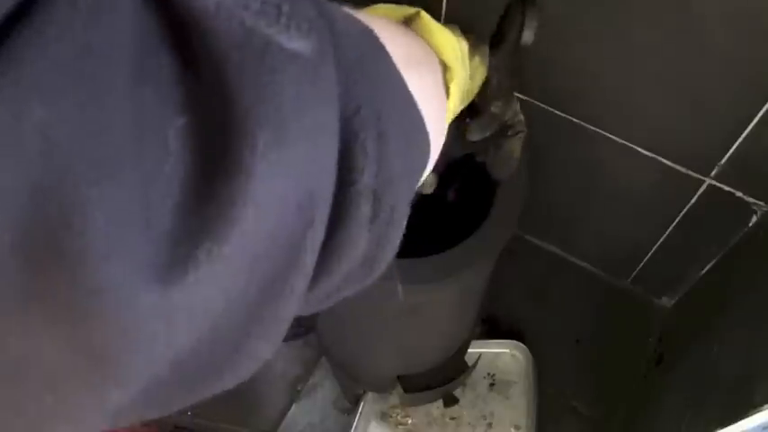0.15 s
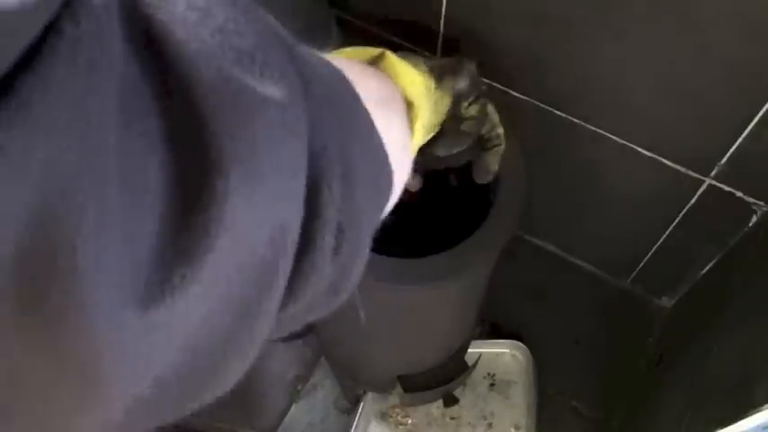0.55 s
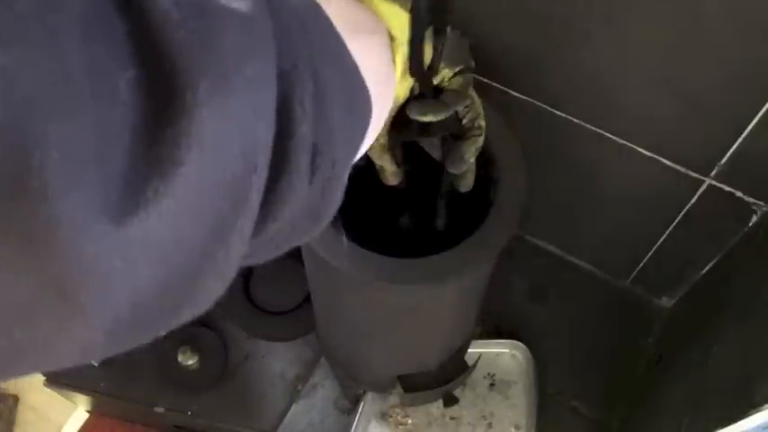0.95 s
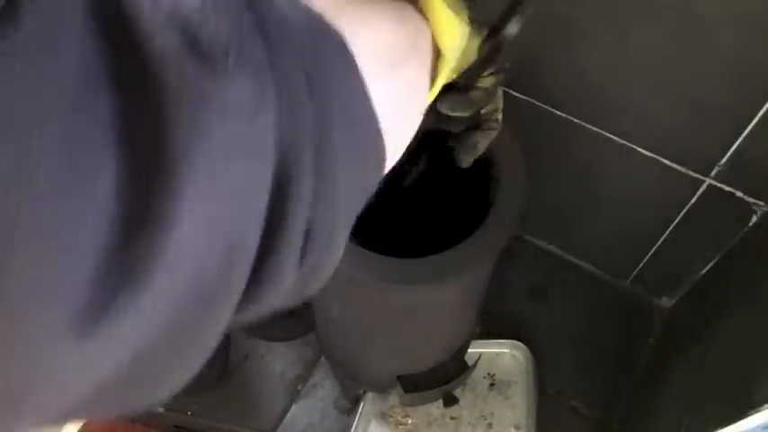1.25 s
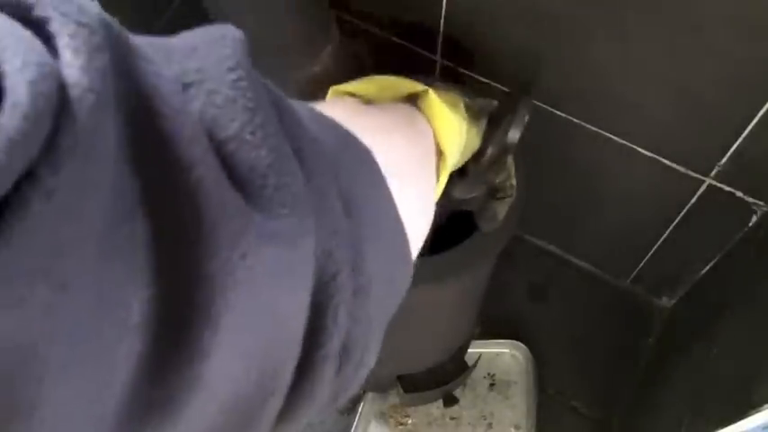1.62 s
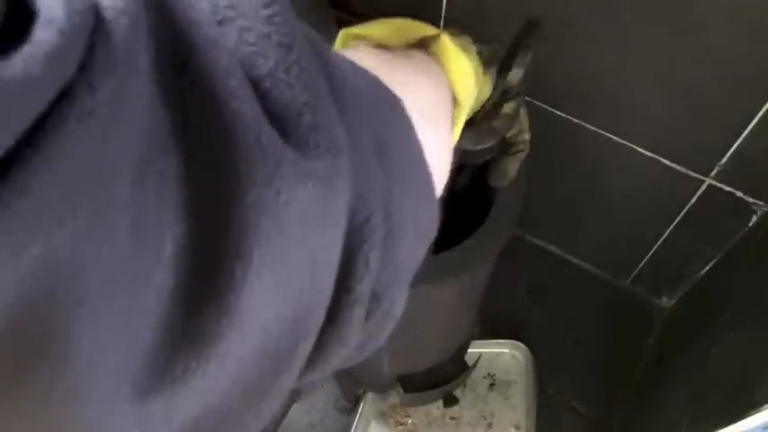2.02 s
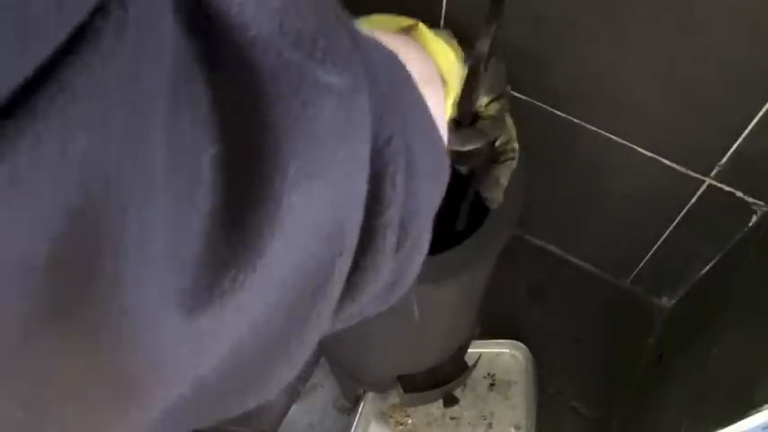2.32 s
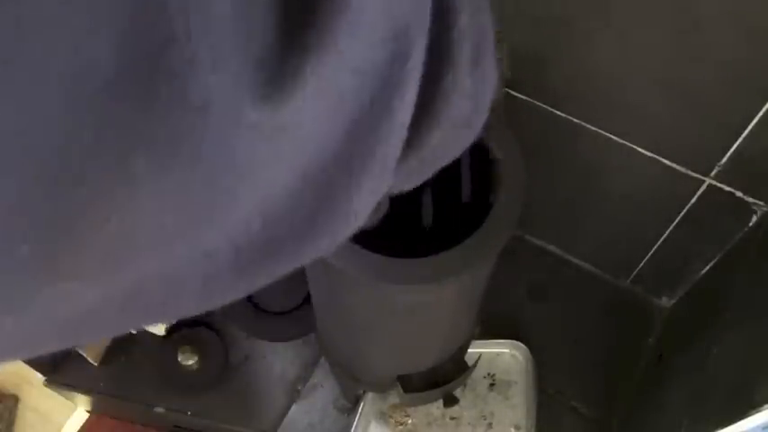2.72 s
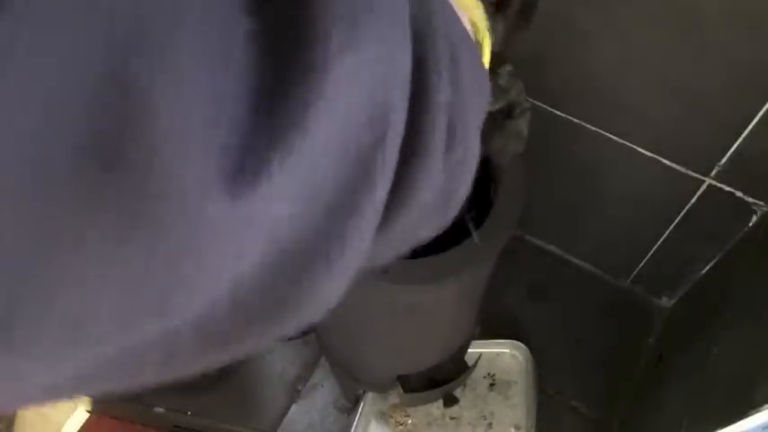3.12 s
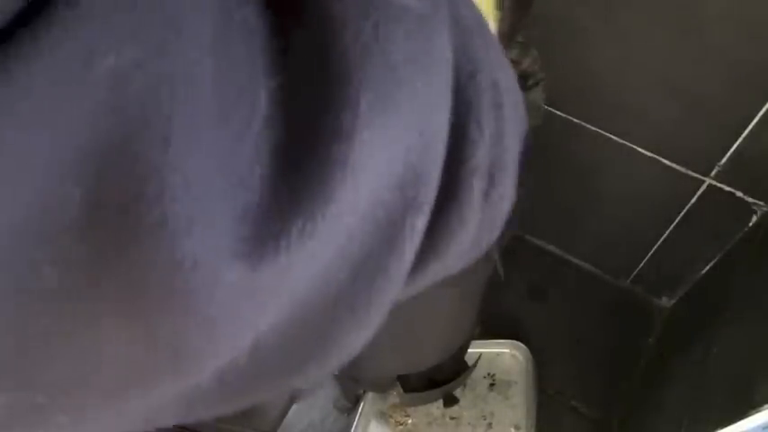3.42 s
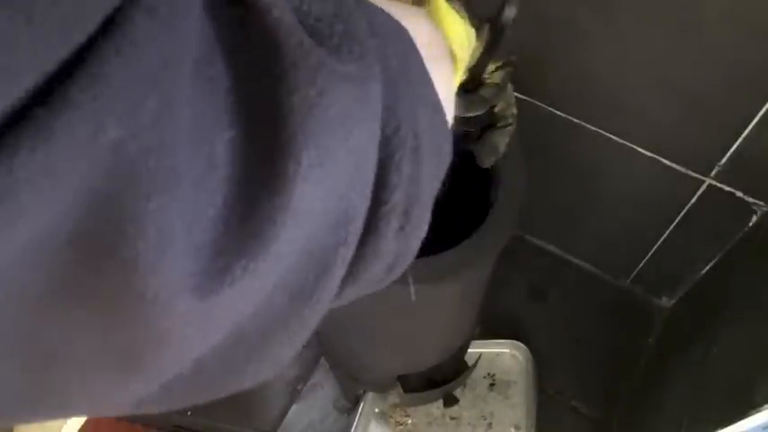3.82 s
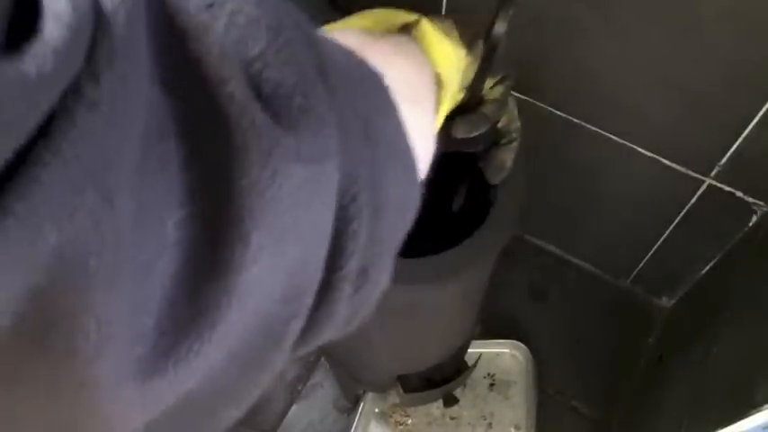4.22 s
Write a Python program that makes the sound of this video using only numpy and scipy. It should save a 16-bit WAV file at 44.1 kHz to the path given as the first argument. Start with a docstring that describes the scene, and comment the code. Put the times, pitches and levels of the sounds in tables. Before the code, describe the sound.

Close by, metal tongs knock unevenly around the inside of a small stove, making bright ringing clacks over a hollow boom. Short gritty scrapes and cracking cinders fill the gaps, and a loose grate shifts with dull knocks and small chinks. The strikes come singly and in quick clusters, ending on one more thudding clack. The stove rings on faintly in a tiled corner with a short echo and quiet background hiss.

```python
"""Sharp, ringing clacks of steel tongs against the firebox of a small metal stove.
Each blow rings the wall, the tongs and the hollow inside. Between blows the tips stick and
slip through ash, scraping and cracking cinders, while the loose grate bumps, groans and
chinks in its seat. The stove sings on faintly; a tiled corner adds a short reverb."""
import sys
import numpy as np
from scipy import signal
from scipy.fft import rfft, irfft, next_fast_len
from scipy.io import wavfile
from scipy.ndimage import map_coordinates

SR = 44100
rng = np.random.default_rng(int(sys.argv[2]) if len(sys.argv) > 2 else 0)


def store_pcm(level_fs):
    """Save levels as 16-bit WAV."""
    pcm = np.round(np.clip(level_fs, -1, 1) * 32767).astype(np.int16)
    wavfile.write(sys.argv[1], SR, np.atleast_2d(pcm).T)


N = 192449
TIME_S = np.arange(N) / SR
AGE_S = np.arange(SR // 2) / SR  # time since a blow


# blows on the firebox, relative levels:
# start_s, clack_db, treble_db, wall_db, spot_hz, tongs_db, thump_db
TONG_BLOWS = [(0.0234, -27, -32, -40, 1260, -39, -34), (0.0557, -16.5, -9, -43, 1620, -45, -62),
              (0.1661, -19, -8, -43.5, 930, -31, -34), (0.5265, -12.5, -7.5, -25.5, 2010, -35, -38),
              (0.6261, -27, -6, -40, 1010, -34, -44), (1.265, -14.5, -2, -23, 1330, -31, -42),
              (1.3167, -29, -5, -27, 1210, -30, -39), (1.4294, -22.5, -57, -28.5, 1100, -36.5, -40.5),
              (1.6231, -15.5, 4, -38, 1070, -31.5, -32.5), (2.0019, -31, 7.5, -36.5, 1290, -36, -31),
              (2.1119, -21, -34, -26.5, 1630, -34.5, -34.5), (2.2067, -15, 4, -39, 1470, -42, -29),
              (2.3055, -23.5, -8, -32.5, 1740, -32.5, -42), (2.3351, -25, -6, -27, 2000, -34.5, -59),
              (2.7253, -49, -25, -25.5, 1440, -46, -34), (2.744, -16.5, -5, -26, 1440, -31, -33),
              (2.838, -47, -18, -24, 1420, -37.5, -31), (2.861, -42, -14, -30, 1370, -41.5, -27),
              (3.573, -11.5, 0, -28.5, 2180, -52, -45), (3.7755, -27.5, -12, -32, 1130, -36.5, -25.5),
              (4.3231, -29.5, 2, -31.5, 970, -47, -21.5)]
# tips springing free: start_s, pitch_hz, level_db, t60_s
TIP_PINGS = [(3.238, 5900, -43.5, 0.16), (3.283, 6480, -46, 0.15), (3.284, 5230, -55, 0.34)]

def strikes(choke_s=0.42):
    """Each blow clacks and rings wall, tongs and firebox air; the tips ping as they spring free."""
    out = np.zeros(N)
    choke = np.exp(-(AGE_S / choke_s) ** 4)  # tongs settle against the wall, damping both
    for start_s, clack_db, treble_db, wall_db, spot_hz, tongs_db, thump_db in TONG_BLOWS:
        metal = choke * (amp(wall_db) * wall_ring(spot_hz) + amp(tongs_db) * tongs_ring())
        contact = amp(clack_db - 5.5) * clack(treble_db)
        add(out, start_s, contact + metal + amp(thump_db) * thump(shudder_db=-7))
    for start_s, pitch_hz, level_db, t60_s in TIP_PINGS:
        ping = struck(np.sin(2 * np.pi * pitch_hz * AGE_S) * fade(t60_s))
        add(out, start_s, amp(level_db) * ping)
    return out


# steel contact: freq_hz, density_db
CLACK_SPECTRUM = [(100, -49), (600, -13), (1500, -11.5), (2600, -4.5), (3600, -0.5), (4500, 1.5),
                  (5500, -3), (7300, -5.5), (8100, -9), (9500, -11.5), (12000, -19.5), (15000, -34)]

def clack(treble_db, prong_lag_s=0.0033, prong_db=-9):
    """Steel on steel, one prong just after the other; harder contacts carry more treble."""
    knots_hz = np.linspace(0, SR / 2, num=110)
    colour_db = 2 * rng.standard_normal(len(knots_hz))
    shelf = [(6300, 0), (9500, 1)]
    burst = coloured(rng.standard_normal(len(AGE_S)), CLACK_SPECTRUM)
    burst = filtered(burst, lambda hz: amp(np.interp(hz, knots_hz, colour_db)
                                           + treble_db * along(shelf, hz)))
    first_prong = (fade(t60_s=.047) + amp(-4) * fade(t60_s=.015)) * rise(.0002)
    second_prong = amp(prong_db) * np.interp(AGE_S - prong_lag_s, AGE_S, first_prong)
    return struck(burst * np.hypot(first_prong, second_prong))


# firebox wall: pitch_hz, level_db, t60_s
WALL_MODES = [(728, -1, .3), (1038, -4, .2), (1057, 0, .26), (1222, -6, .2), (1364, -1, .22),
              (1418, -4, .26), (1531, 0, .22), (1568, -3, .2), (1723, -5, .2), (1925, -6, .2),
              (2135, -4, .24), (2176, 1, .26), (2380, -8, .2), (2559, 0, .2)]
# its dense weak modes: freq_hz, density_db
WALL_SPECTRUM = [(300, -26), (620, -1), (1000, -13), (1600, 0.5), (2400, -2), (3200, 5), (6000, -35)]

def wall_ring(spot_hz, focus_db=13):
    """The struck spot favours wall modes near one pitch."""
    def favour_db(hz):
        return -focus_db * np.log2((hz + 1) / spot_hz) ** 2

    modes = [(hz, db + favour_db(hz), t60_s) for hz, db, t60_s in detuned(WALL_MODES, spread=.0019)]
    spectrum = [(hz, db + favour_db(hz) / 2) for hz, db in WALL_SPECTRUM]
    return amp(-.5) * ring(modes, scatter_db=2.5) + amp(-4.5) * dense_ring(spectrum, t60_s=.11)


# steel tongs: pitch_hz, level_db, t60_s
TONGS_MODES = [(2692, -4, .2), (2929, -4, .2), (3171, -2, .22), (3494, -2, .17), (3677, -3, .22),
               (3960, -1, .22), (4151, -1, .24), (4436, -1, .17), (4657, -3, .2), (5233, -4, .2),
               (5674, -4, .17), (6067, -6, .2), (6288, -7, .2), (6729, -8, .2), (7230, -7, .17)]
# their dense weak modes: freq_hz, density_db
TONGS_SPECTRUM = [(1200, -50), (2500, 5.5), (4200, 13), (7200, -13.5), (8100, -1), (9500, -14),
                  (12000, -56), (15000, -42)]

def tongs_ring():
    """The tongs ring a little differently with every grip."""
    modes = detuned(TONGS_MODES, spread=.018)
    return ring(modes, scatter_db=3) + dense_ring(TONGS_SPECTRUM, t60_s=.1)


# firebox air: pitch_hz, width_hz, level_db
AIR_MODES = [(148, 40, -11), (248, 28, -9), (319, 28, -1), (340, 28, 0), (720, 45, -10)]
# shaking stove body: freq_hz, density_db
RUMBLE_SPECTRUM = [(20, 4), (50, -2), (85, -10), (140, -6), (215, 0.5), (450, -8), (900, -12), (2500, -44)]

def thump(shudder_db, boom_db=11):
    """A blunt push and a short shudder of the stove boom in the firebox."""
    shift = np.exp(.025 * rng.standard_normal())  # the hand in the opening retunes the air
    air = [(hz * shift, width_hz, db) for hz, width_hz, db in AIR_MODES]
    shudder = rng.standard_normal(len(AGE_S)) * fade(t60_s=.05) * rise(.014)
    dull_shudder = coloured(shudder, [(500, -5.5), (1200, -6), (2500, -24), (6000, -42)])
    rattle = struck(resonate(dull_shudder, air))
    push = AGE_S * np.exp(-AGE_S / .00042)
    boom = struck(resonate(push, air) * rise(.012))
    hollow = struck(rattle + amp(boom_db) * boom)
    return struck(hollow + amp(shudder_db) * struck(coloured(shudder, RUMBLE_SPECTRUM)))


# tips rubbing: freq_hz, density_db
SCRAPE_SPECTRUM = [(100, 7), (400, -12), (560, -23), (730, 20), (900, -1), (1100, 4.5), (1700, 11),
                   (2500, -3), (3500, -14), (6000, -70)]

def raking(slip_rate_hz=70, slip_db=-1.5):
    """The tips stick and slip over cinders, shaking the firebox and crushing grit."""
    rumble_gain, scrape_gain, grit_gain = stroke_gains()
    wander = map_coordinates(rng.standard_normal(2000), [TIME_S * slip_rate_hz])
    slips = unit(amp(slip_db * wander))
    judder = grains(rate_hz=730, spread_db=3) * slips
    rumble = amp(-5) * unit(resonate(judder, AIR_MODES)) + amp(-4.5) * coloured(judder, RUMBLE_SPECTRUM)
    rub = grains(rate_hz=2000, spread_db=4) * slips
    damped_wall = ring(WALL_MODES, scatter_db=2) * fade(t60_s=.5)
    scrape = amp(-6) * coloured(rub, SCRAPE_SPECTRUM) + amp(-11.5) * drive(rub, damped_wall)
    return rumble_gain * rumble + scrape_gain * scrape + grit_gain * cinders(slips)


# pulls through the ash: start_s, length_s, end_pressure_db, build_db, grit_over_scrape_db
RAKE_STROKES = [(0.0, 0.013, -27.5, -29, -4), (0.089, 0.097, -32, 5, -8), (0.288, 0.12, -48, -11, -9),
                (0.592, 0.076, -25, 6.5, -3.5), (0.689, 0.08, -17.5, 9, -4.5),
                (0.878, 0.11, -41, 14.5, 9.5), (0.95, 0.12, -31.5, 1, -0.5), (1.14, 0.042, -39, 14, 0),
                (1.63, 0.12, -35.5, -0.5, -3), (1.784, 0.14, -43, -4, 0), (2.218, 0.074, -34, -4.5, -6),
                (2.312, 0.064, -21, 9.5, -12), (2.4, 0.02, -35.5, 9, 0.5), (2.532, 0.031, -66, 8, 14),
                (2.644, 0.1, -61.5, 1.5, 4), (2.874, 0.21, -53.5, -15.5, -7.5), (3.02, 0.14, -33, 2, -7),
                (3.246, 0.05, -37, 2, -9.5), (3.642, 0.079, -29, -2, -6), (3.717, 0.085, -26.5, 17, -7.5),
                (3.842, 0.066, -37.5, -5, -8)]

def stroke_gains(bite_s=0.014):
    """Each pull bites, changes pressure and lets go: gains of rumble, scrape and grit."""
    power = np.zeros((3, N))
    fall_db_per_s = np.array([[143], [201], [244]])
    for start_s, length_s, end_db, build_db, grit_db in RAKE_STROKES:
        age_s = TIME_S - start_s
        bite = np.clip(age_s / bite_s, 0, 1)
        pressure_db = end_db - build_db * np.clip(1 - age_s / length_s, 0, 1)
        rumble_db = -15.5 + .62 * pressure_db  # even a light pull rumbles
        levels_db = np.array([rumble_db, pressure_db, pressure_db + grit_db])
        release_db = fall_db_per_s * np.maximum(age_s - length_s, 0)
        power += (bite * amp(levels_db - release_db)) ** 2
    return np.sqrt(power)


# crushed ash: freq_hz, density_db
GRIT_SPECTRUM = [(1000, -49), (2300, 1), (3300, 9), (4500, 2), (6000, 1.5), (7400, -4.5), (8100, -6),
                 (9200, -3), (11000, -10.5), (15000, -22.5)]

def cinders(slips, lumps=6):
    """Fine ash hisses; coarser lumps snap against the tips and ring the tongs."""
    ash = coloured(grains(rate_hz=3000, spread_db=3.5) * slips, GRIT_SPECTRUM)
    snaps = [grains(rate_hz=40, spread_db=4) * slips for _ in range(lumps)]
    crunch = unit(sum(drive(snap, cinder_ring()) for snap in snaps))
    return amp(-9) * ash + amp(-2.5) * crunch + amp(-11) * drive(sum(snaps), tongs_ring())


def cinder_ring(scatter_db=7):
    """Every lump has its own resonances."""
    knots_hz = np.geomspace(1000, 15000, num=36)
    colour_db = along(GRIT_SPECTRUM, knots_hz) + scatter_db * rng.standard_normal(len(knots_hz))
    return dense_ring(list(zip(knots_hz, colour_db)), t60_s=.043)


# cinders breaking: start_s, relative_db
CINDER_CRACKS = [(0.5902, -24), (0.659, -27), (0.746, -24), (0.772, -19), (0.858, -29), (0.9674, -26),
                 (1.181, -33), (1.742, -31), (1.925, -40.5), (2.38, -28), (3.2357, -32.5), (3.691, -29)]

def cracks():
    """Larger cinders break with a bright snap that stirs the wall."""
    out = np.zeros(N)
    for start_s, relative_db in CINDER_CRACKS:
        crack = amp(-8.5) * clack(treble_db=5) + amp(-15) * wall_ring(spot_hz=1260)
        add(out, start_s, amp(relative_db) * crack)
    return out


# blunt knocks: start_s, level_db
GRATE_BUMPS = [(.001, -25.5), (0.136, -37), (0.427, -26.5), (0.455, -36), (0.639, -23), (0.715, -35),
               (.803, -29), (1.131, -36.5), (1.183, -36), (1.216, -36.5), (1.807, -32), (2.494, -34),
               (3.175, -29), (3.241, -37), (4.091, -36.5)]
# slides in the seat: start_s, length_s, level_db
GRATE_SHOVES = [(1.045, 0.031, -33.5), (1.789, 0.022, -34), (1.858, 0.051, -31.5), (2.365, 0.028, -25),
                (2.414, 0.012, -42), (2.725, 0.025, -29.5), (2.84, 0.066, -32.5), (3.855, 0.072, -29.5)]
# groan of the seat: pitch_hz, width_hz, level_db
SEAT_MODES = [(525, 27, 2), (768, 26, 16), (1063, 37, 3.5), (1040, 33, 9)]
# bar contacts: start_s, relative_db
BAR_CHINKS = [(1.861, -35.5), (2.381, -27.5), (4.078, -36)]
# grate bars: pitch_hz, level_db, t60_s
BAR_MODES = [(1034, -4, .06), (1707, -15, .2), (2697, -16, .4), (2832, -10, .3), (3450, -8, .14),
             (3590, -2, .15), (4996, -21, .2), (6950, -21, .15)]

def grate():
    """The loose grate bumps and groans in its seat, and its bars chink."""
    out = np.zeros(N)
    for start_s, level_db in GRATE_BUMPS:
        add(out, start_s, amp(level_db) * thump(shudder_db=-15))
    for start_s, length_s, level_db in GRATE_SHOVES:
        slide = np.sqrt(np.clip(1 - AGE_S / length_s, 0, 1))  # breaks loose at once, then slows
        friction = slide * grains(rate_hz=810, spread_db=0)[:len(AGE_S)]
        add(out, start_s, amp(level_db) * struck(resonate(friction, SEAT_MODES)))
    for start_s, relative_db in BAR_CHINKS:
        chink = ring(BAR_MODES, scatter_db=1.5) + amp(-9) * dense_ring(CLACK_SPECTRUM, t60_s=.08)
        add(out, start_s, amp(relative_db - 1) * chink)
    return out


# lightly damped stove modes: pitch_hz, level_db, t60_s
LONG_MODES = [(807, -4, .4), (1330, -6, .9), (1455, -6, .85), (1925, 3, .5), (2697, -6, .4)]

def after_ring(contacts, level_db=-56):
    """Every contact feeds the stove's longest modes, which sing on faintly."""
    shaking = np.abs(contacts) * rng.standard_normal(N)
    return amp(level_db) * drive(shaking, ring(LONG_MODES, scatter_db=0))


# reverb decay: freq_hz, t60_s
CORNER_DECAY = [(100, .28), (1000, .28), (5000, .24), (14000, .15)]

def tiled_corner(x):
    """Reflections off the tiles, the treble dying first."""
    hz, age_s, noise = signal.stft(rng.standard_normal(SR // 2), SR, nperseg=256)
    decay = amp(-60 * age_s / along(CORNER_DECAY, hz)[:, None])
    _, tail = signal.istft(noise * decay, SR, nperseg=256)
    tail = np.concatenate([np.zeros(SR // 200), tail])  # 5 ms predelay
    return signal.fftconvolve(x, tail / np.linalg.norm(tail))[:N]


# background noise: freq_hz, density_db
ROOM_SPECTRUM = [(12, -2), (20, -1.5), (64, 2.5), (126, -11.5), (491, -15), (1130, -25), (1300, -26),
                 (1770, -22), (2330, -27.5), (4680, -26.5), (6540, -29.5), (7310, -30.5), (15500, -33.5)]

def room_tone(level_db=-50):
    """A faint, steady low rumble and hiss."""
    return amp(level_db) * coloured(rng.standard_normal(N), ROOM_SPECTRUM)


def ring(modes, scatter_db):
    """Decaying modes; each contact shares the energy out anew."""
    hz, db, t60_s = np.transpose(modes)[:, :, None]
    size = amp(db + scatter_db * rng.standard_normal(hz.shape))
    phase = rng.uniform(0, 2 * np.pi, hz.shape)
    return struck(np.sum(size * fade(t60_s) * np.sin(2 * np.pi * hz * AGE_S + phase), axis=0))


def dense_ring(spectrum, t60_s):
    """A crowd of weak modes, as decaying noise."""
    return struck(coloured(rng.standard_normal(len(AGE_S)), spectrum) * fade(t60_s))


def detuned(modes, spread):
    """Each contact loads a body differently and shifts its modes."""
    return [(hz * np.exp(spread * rng.standard_normal()), db, t60_s) for hz, db, t60_s in modes]


def grains(rate_hz, spread_db):
    """Random tiny impacts; spread_db makes a few much larger."""
    size = amp(spread_db * np.minimum(rng.standard_exponential(N), 3.5))
    hits = rng.random(N) < rate_hz / SR
    return unit(hits * size * rng.choice([-1, 1], N))


def resonate(force, modes):
    """A force drives parallel band-pass resonances."""
    return filtered(force, lambda hz: sum(
        amp(db) * 1j * hz * width_hz / (pitch_hz ** 2 - hz ** 2 + 1j * hz * width_hz)
        for pitch_hz, width_hz, db in modes))


def drive(force, body_ring):
    """Small impacts excite a body's ring, at rms 1."""
    return unit(signal.fftconvolve(force, body_ring)[:N])


def coloured(x, spectrum):
    """Shape x by a spectrum, at rms 1."""
    return unit(filtered(x, lambda hz: amp(along(spectrum, hz))))


def filtered(x, response):
    """Apply a complex frequency response."""
    size = next_fast_len(len(x) + SR // 4)
    return irfft(rfft(x, size) * response(np.fft.rfftfreq(size, 1 / SR)), size)[:len(x)]


def along(points, hz):
    """Interpolate on a log frequency axis."""
    knots_hz, values = np.transpose(points)
    return np.interp(np.log(hz + 1), np.log(knots_hz + 1), values)


def struck(x):
    """Scale a blow to rms 1 over its first 30 ms."""
    return x / np.sqrt(np.mean(x[AGE_S < .03] ** 2))


def rise(tau_s):
    return 1 - np.exp(-AGE_S / tau_s)


def fade(t60_s):
    return amp(-60 * AGE_S / t60_s)


def amp(db):
    return 10 ** (np.asarray(db) / 20)


def unit(x):
    return x / np.sqrt(np.mean(x ** 2) + 1e-20)


def add(track, start_s, sound):
    part = track[max(0, round(start_s * SR)):][:len(sound)]
    part += sound[:len(part)]


def scene():
    """The raked stove in its corner, mono."""
    contacts = strikes() + cracks() + grate() + raking()
    stove = contacts + after_ring(contacts)
    background = room_tone()
    return (stove + amp(-8) * tiled_corner(stove) + background)[None]


# narrow treble dip: freq_hz, gain_db
TREBLE_NOTCH = [(7700, -1.5), (8150, -14), (8500, -1.5)]

def record(dry, ceiling=0.85, cutoff_hz=15500):
    """Treble notch, soft peak limit, steep low-pass."""
    x = filtered(dry[0], lambda hz: amp(along(TREBLE_NOTCH, hz)))
    x = x / (1 + np.abs(x / ceiling) ** 6) ** (1 / 6)
    return filtered(x, lambda hz: 1 / (1 + (hz / cutoff_hz) ** 120))[None]


dry = scene()
out = record(dry)
store_pcm(out)
```